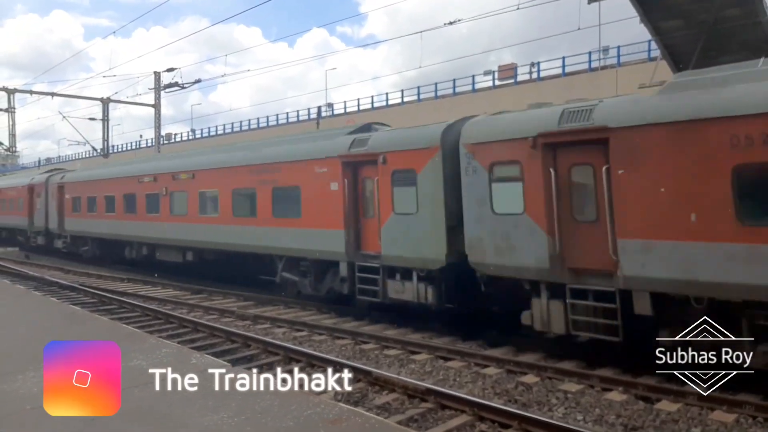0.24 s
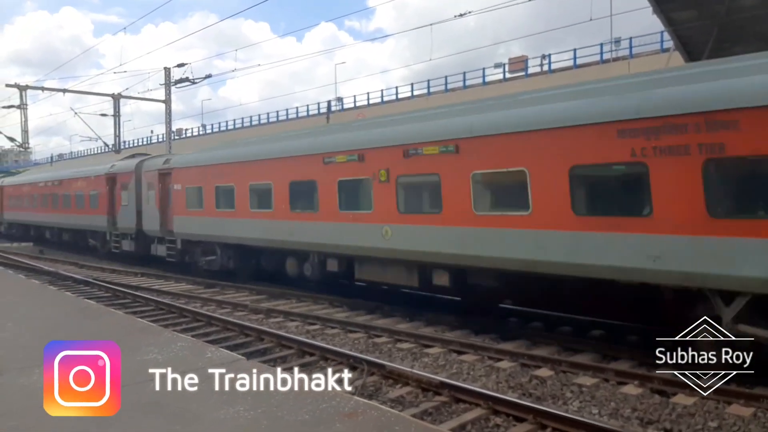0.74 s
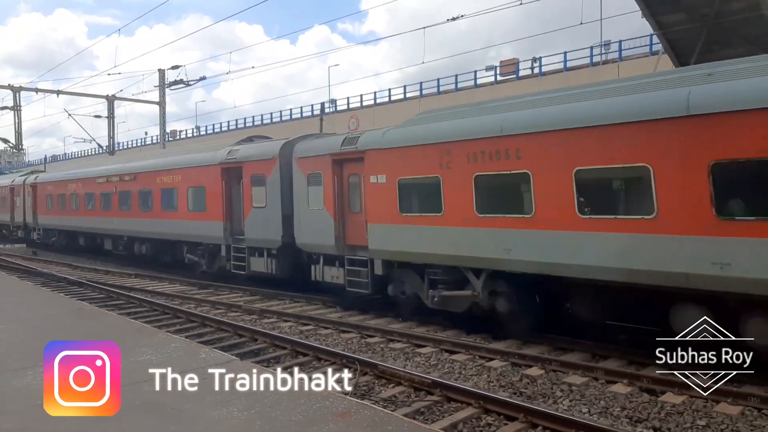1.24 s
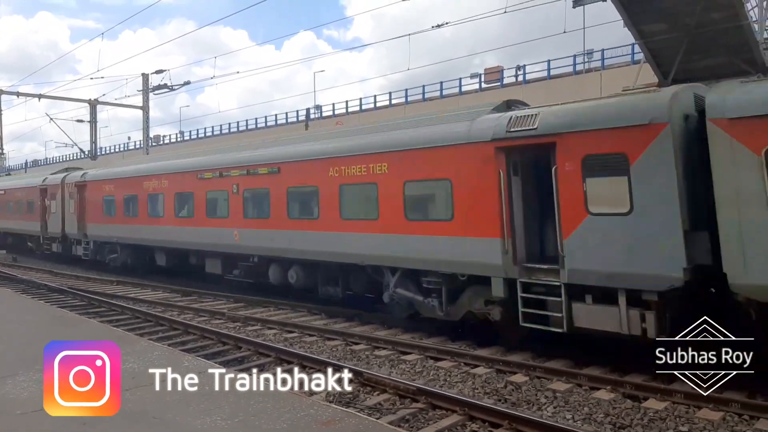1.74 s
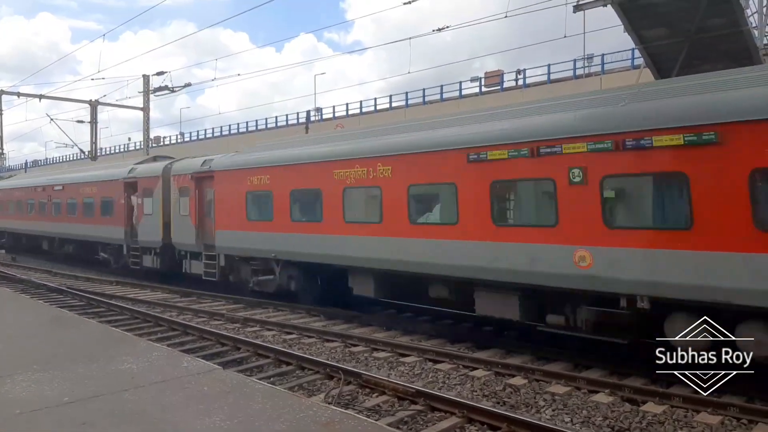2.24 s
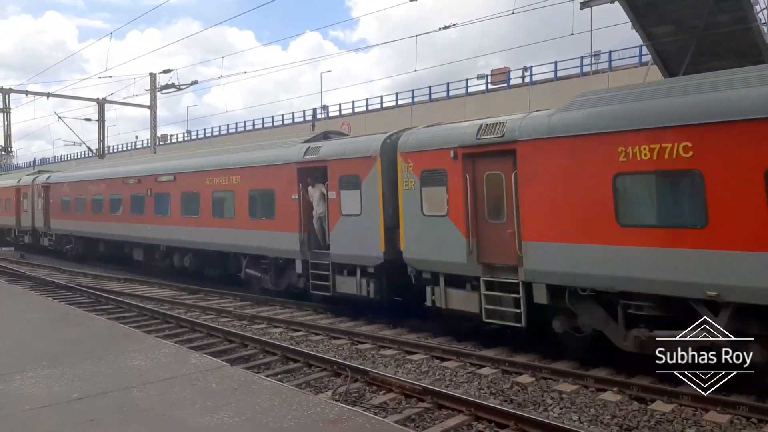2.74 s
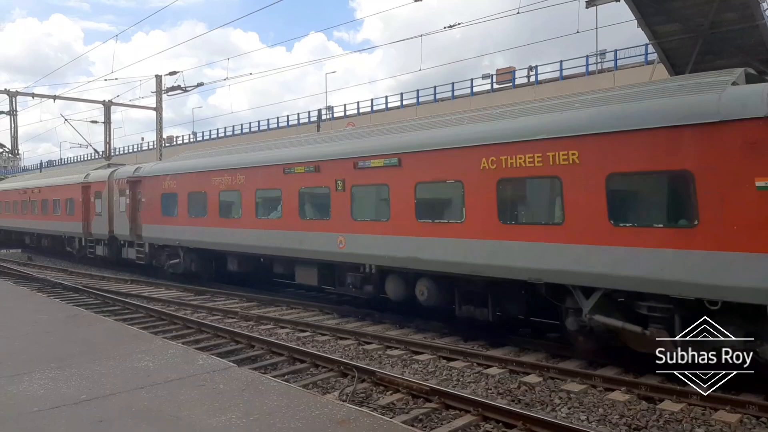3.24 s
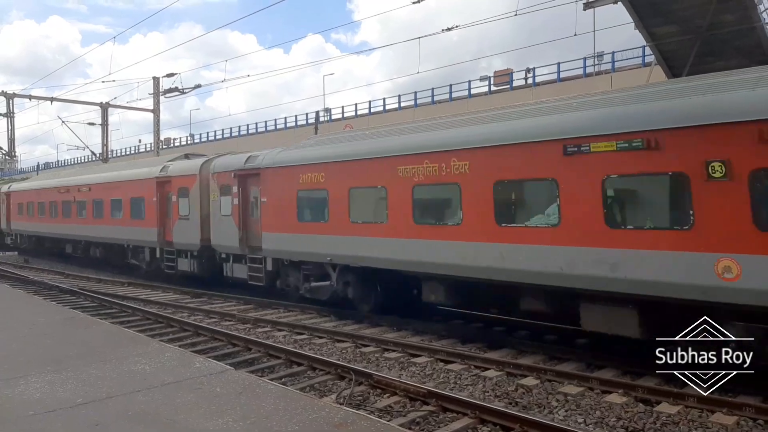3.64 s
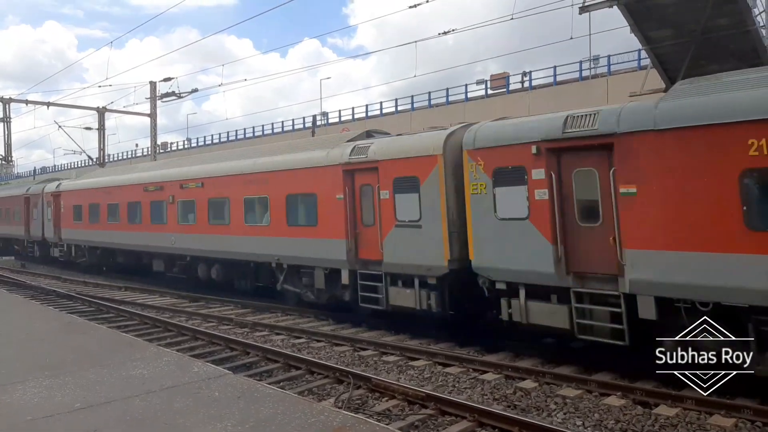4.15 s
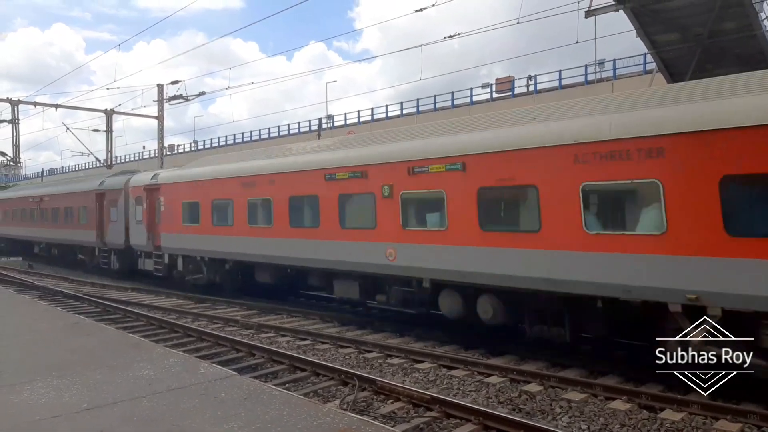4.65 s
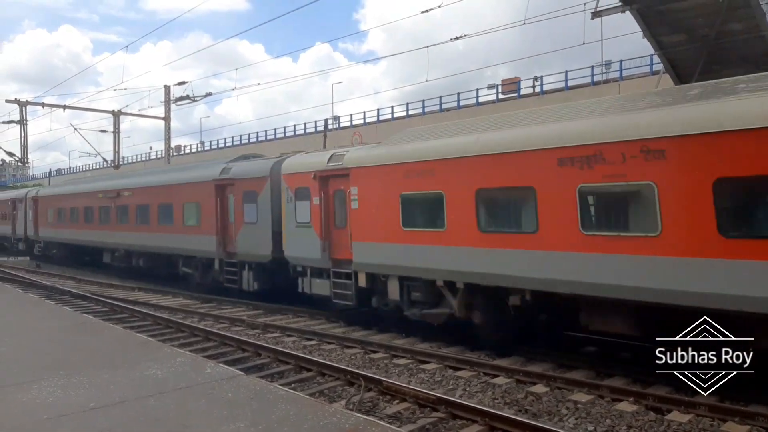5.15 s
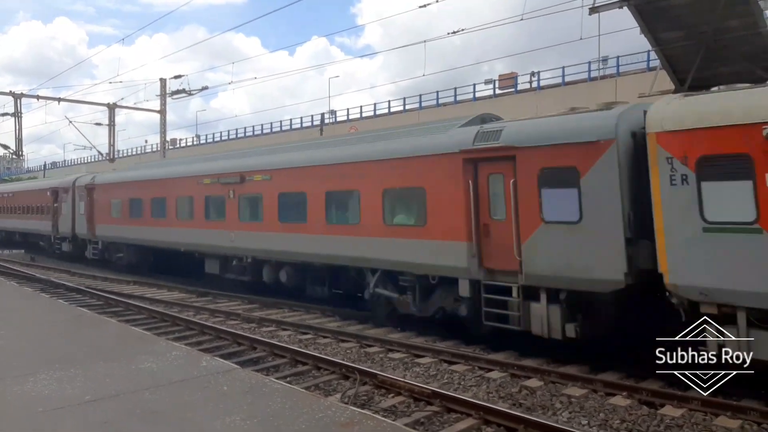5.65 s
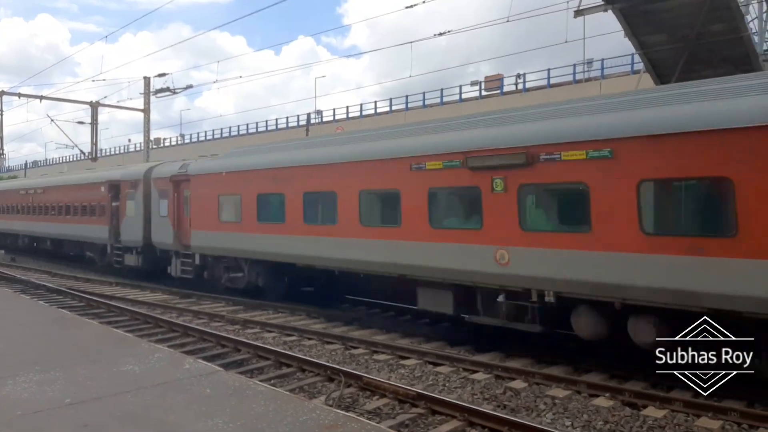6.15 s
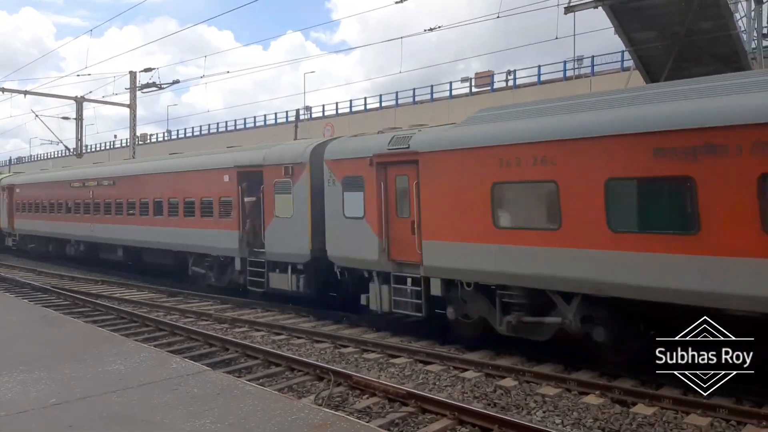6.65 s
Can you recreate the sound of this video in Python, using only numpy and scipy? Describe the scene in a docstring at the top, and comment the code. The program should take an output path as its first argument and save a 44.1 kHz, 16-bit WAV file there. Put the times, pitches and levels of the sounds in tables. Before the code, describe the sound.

Passenger train coaches roll past close by, wheels thudding and clanging over rail joints in a steady rhythm above a low rumble.

```python
"""Express coaches over a rail crossing

Coaches roll past a station platform, slowly losing speed. Every bogie meets the same joints and dips,
first with its leading and then with its trailing axle. The impacts excite damped modes: the track thuds
and the wheels clang. Flange friction scrapes and sizzles. Between the blows, surface roughness keeps up
a rumble, a rail hiss and the singing of the wheels, while the coach bodies drone."""
import sys
import numpy as np
from scipy import signal
from scipy.fft import rfft, irfft, next_fast_len
from scipy.io import wavfile
from scipy.ndimage import map_coordinates

SR = 44100
rng = np.random.default_rng(int(sys.argv[2]) if len(sys.argv) > 2 else 0)


def transcribe(u):
    """Save the signal u as a 16-bit wav file named by the first command-line argument.

    u: samples, shape (n,) or (channels, n), limited to [-1, 1]; the rate is SR.
    q: integer samples, one column per channel.
    """
    v = np.clip(np.atleast_2d(u).T, -1, 1)
    q = np.round(v * 32767).astype(np.int16)
    wavfile.write(sys.argv[1], SR, q)


N = 303849
SPEED_M_PER_S, BRAKING_M_PER_S2, WHEELBASE_M = 18.7, 0.17, 2.56

# The passing bogies. Each row: arrival at the first joint in seconds, then relative levels in dB of the
# clang, the leading wheel's extra at that joint, its extra on landing just after, the scrape, the sizzle,
# the trailing wheel's extra rub, the roar, the thump at the nose and the tread hiss.
BOGIE_PASSES = [(-.141, -7.5, 0, 0, 3, 1.5, -0.5, 0, 0.5, -0.5),
                (.355, -7, -1.5, 0, 0.5, -1.5, 0, -0.5, 1, 0),
                (1.148, -9.5, -1.5, -2, 2.5, -2.5, -2, -1, 0, -1),
                (1.634, -10.5, -1.5, -6, -1.5, -7, 3, -0.5, 2, -2),
                (2.439, -9, 0.5, -3, -1, -12, 0.5, -0.5, -3, -2.5),
                (2.932, -11, -4, -8, 0.5, -3.5, 1, 0, 5, 2),
                (3.747, -3, -4.5, -2.5, 1, -6.5, 1.5, 0.5, -2, 0),
                (4.248, -6.5, -1.5, 0.5, 1, -2, 1, -1, -0.5, 1.5),
                (5.073, -4.5, -3, -2, 2.5, 6.5, -1, 0, -5, -2),
                (5.578, -6.5, -5, 0.5, -.5, -5.5, 2, -0.5, 0, 0),
                (6.417, -6, -1, -3, 1, -3, 0, -1.5, 1, -1), (6.925, -3, 0, 0, 0, 0.5, 0, 0, -2, -1)]
# Modes of the crossing's steel. Each row: frequency in Hz, relative level in dB, t60 in seconds.
CROSSING_MODES = [(990, -16, 0.039), (1390, -7, 0.055), (1870, -6.5, 0.13), (2225, -10, 0.31),
                  (2336, 1.5, 0.12), (2680, -6, 0.36), (2920, -25, 0.078), (3417, -0.5, 0.06),
                  (4200, -2.5, 0.086), (3930, -12, 0.051), (4200, -10, 0.023), (4280, -5.5, 0.095),
                  (4960, -23, 0.11)]
# Modes of the loaded ballast. Each row: frequency in Hz, relative level in dB, t60 in seconds.
BALLAST_MODES = [(102, -14, 0.12), (134.1, -3.5, 0.27), (158, -4.5, 0.096)]
# Hardest blows on the bogie frames, from rail dips and slack in the suspension.
# Each row: start in seconds, relative level in dB.
HARD_BLOWS = [(0.022, -7.0), (0.157, -6.0), (0.464, -4.0), (0.51, -8.0), (0.644, -7.0), (0.836, -16),
              (1.253, -6.0), (1.305, -5.0), (1.588, -19), (1.688, -10), (1.738, -8.0), (1.822, -6.0),
              (1.927, -6.0), (2.051, -12), (2.195, -16), (2.266, -15), (2.599, -5.0), (2.731, -8.0),
              (2.984, -9), (3.091, -5.0), (3.12, -8.0), (3.227, -6.0), (3.606, -16), (3.838, -7.0),
              (3.868, -6.0), (3.904, -6.0), (4.045, -7.0), (4.296, -8.0), (4.336, -8.0), (4.544, -6.0),
              (4.9, -16), (5.121, -8), (5.165, -8.0), (5.227, -8.0), (5.37, -8.0), (5.626, -8.0),
              (5.683, -6.0), (5.739, -7.0), (6.528, -7.0), (6.608, -8.0), (6.642, -8.0), (6.672, -6.0)]


def amp(db):
    """Decibels to amplitude ratio."""
    return 10 ** (np.asarray(db) / 20)


def unit(x):
    """Normalisation to rms 1."""
    return x / np.sqrt(np.mean(x ** 2) + 1e-20)


def along(points, hz):
    """Interpolation of (Hz, value) points on a logarithmic frequency axis."""
    frequencies, values = np.transpose(points)
    return np.interp(np.log(hz + 1), np.log(frequencies), values)


def shape(points):
    """Magnitude response through (Hz, dB) points."""
    return lambda hz: amp(along(points, hz))


def wobble(rate):
    """Smooth random modulation with rate knots a second."""
    return map_coordinates(rng.standard_normal(1024), [np.arange(N) * rate / SR], mode="wrap")


def filtered(x, response):
    """Linear filtering: the spectrum is multiplied by a frequency response."""
    size = next_fast_len(N + SR // 4)
    return irfft(rfft(x, size) * response(np.fft.rfftfreq(size, 1 / SR)), size)[..., :N]


def add(track, s, sound):
    """Superposition of a sound on a track, starting at s seconds."""
    start = int(round(s * SR))
    first, end = max(start, 0), min(start + len(sound), N)
    if end > first:
        track[first:end] += sound[first - start:end - start]


def shaken(force, response):
    """Random excitation: the force sets the level of a stereo noise, the response only its colour."""
    # Likeness of left and right. Each row: frequency in Hz, coherence from 0 to 1.
    coherence = [(30, 0.5), (120, 1), (300, 0.66), (600, 0.9), (1100, 0.32), (2200, 0.27), (4200, 0),
                 (8000, 0.34), (12000, 0.68)]

    def spread(hz):
        """Coherence divides the normalised response between mid and side."""
        gain = response(hz)
        angle = np.arccos(np.clip(along(coherence, hz), -1, 1)) / 2
        return gain / np.sqrt(np.mean(np.abs(gain) ** 2)) * np.array([np.cos(angle), np.sin(angle)])
    mid, side = filtered(force * rng.standard_normal((2, N)), spread)
    return np.array([mid + side, mid - side])


def impact_envelope(times, levels_db, attack, t60):
    """Incoherent blows add in power, each decaying by 60 dB in t60 seconds."""
    t, power = np.arange(SR) / SR, np.zeros(N)
    pulse = ((1 - np.exp(-t / attack)) * amp(-60 * t / t60)) ** 2
    for s, db in zip(times, levels_db):
        add(power, s, amp(db) ** 2 * pulse)
    return np.sqrt(power)


def struck_modes(times, levels_db, modes, attack, scatter_db, detune):
    """Free vibration: each blow rings damped modes at slightly new strengths and pitches."""
    t, out = np.arange(SR // 8) / SR, np.zeros(N)
    hz, mode_db, t60 = np.transpose(modes)[:, :, None]
    decay = amp(mode_db - 60 * t / t60) * (1 - np.exp(-t / attack))
    scatter = rng.standard_normal((len(times), 2, len(modes), 1))
    for s, db, (size, pitch) in zip(times, levels_db, scatter):
        phase = np.float32(2 * np.pi * hz * (1 + detune * pitch) * t)
        add(out, s, (amp(db + scatter_db * size) * decay * np.sin(phase)).sum(0))
    return out


def passing(levels_db, lag, distance_m):
    """Spherical spreading: summed strength of the bogies, each nearest lag s after the first joint."""
    offset_m = SPEED_M_PER_S * (np.arange(N) / SR - np.array(BOGIE_PASSES)[:, :1] - lag)
    power = amp(np.reshape(levels_db, (-1, 1))) ** 2 / (1 + (offset_m / distance_m) ** 2)
    return np.sqrt(power.sum(0))


def wheel_response(hz):
    """Modal superposition: a steel wheel's resonances add with alternating sign."""
    # Wheel modes. Each row: frequency in Hz, bandwidth in Hz, relative level in dB.
    modes = [(1197, 187, 6), (1634, 75, 4.5), (1845, 114, 5.5), (2347, 110, 3), (2530, 140, -3),
             (2943, 193, 1), (3524, 170, 2), (4023, 190, 2.5), (4530, 230, -2), (6700, 32, -1),
             (7000, 27, -27), (9200, 39, -16), (10800, 30, -24), (11900, 34, -18), (12745, 45, -20)]
    return sum((-1) ** k * amp(db) * 1j * hz * width / (centre ** 2 - hz ** 2 + 1j * hz * width)
               for k, (centre, width, db) in enumerate(modes))


def clinks(force, low_hz, high_hz, tilt, t60, count):
    """Loose steel parts ring at their natural frequencies, more often and harder as the force grows."""
    t, out = np.arange(SR // 14) / SR, np.zeros((2, N))
    chance = rng.random((count, 4))
    quantiles = (np.arange(count) + chance[:, 0]) / count
    starts = np.searchsorted(np.cumsum(force) / force.sum(), quantiles).clip(0, N - 1)
    pitches = low_hz * (high_hz / low_hz) ** chance[:, 1]
    decay = amp(-60 * t / t60)
    for start, hz, stereo_gains in zip(starts, pitches, 2 * chance[:, 2:] - 1):
        ring = np.sqrt(force[start]) * (hz / low_hz) ** tilt * decay * np.sin(2 * np.pi * hz * t)
        for side, gain in zip(out, stereo_gains):
            add(side, start / SR, gain * ring)
    return unit(out) * np.sqrt(np.mean(force ** 2))


def rolling():
    """Roughness excitation: treads make the track rumble, the rails hiss and the running gear jingle."""
    # Spectra of the track and of the rail steel. Each row: frequency in Hz, relative density in dB.
    track_spectrum = [(25, -17), (45, -13), (65, 0), (90, 1.5), (130, 3), (210, -1), (252, 4), (320, 0.5),
                      (420, -4), (750, -3), (1100, -26), (2000, -43), (5000, -73)]
    rail_spectrum = [(200, -54), (500, 10), (900, 6.5), (1400, -11), (2350, 4), (3100, -11.5), (4200, -3.5),
                     (5200, -3), (7700, -8), (8600, -24), (10500, -19), (12600, -16.5), (14500, -30),
                     (16000, -36)]
    # a steady part from the whole train, and a swell as each bogie comes nearest
    load = np.hypot(amp(-26), passing(-23.5, lag=0.32, distance_m=2.42))
    rumble = shaken(load * amp(1.3 * wobble(28)), shape(track_spectrum))
    *_, tread_db = np.transpose(BOGIE_PASSES)
    roughness = amp(0.9 * wobble(30))
    near = roughness * passing(tread_db - 31, lag=0.35, distance_m=4.1)
    far = roughness * amp(-37)
    rail, far_cutoff_hz = shape(rail_spectrum), 5000
    near_hiss = amp(-2.5) * shaken(near, rail)
    far_hiss = amp(-6.5) * shaken(far, lambda hz: rail(hz) / np.hypot(1, hz / far_cutoff_hz))
    both = np.hypot(near, far)
    jingle = amp(-3.5) * clinks(both, low_hz=807, high_hz=4676, tilt=-0.45, t60=0.052, count=4500)
    return rumble + near_hiss + far_hiss + jingle + amp(-5) * shaken(both, wheel_response)


def body_drone():
    """Narrow-band resonance: the coach bodies hum, fairly even in strength but wandering in pitch."""
    # Resonance of the bodies. Each row: frequency in Hz, relative density in dB.
    spectrum = [(150, -25), (225, -10.5), (250, -2.5), (277, 1), (300, -5.5), (345, -26), (500, -51)]
    noise = filtered(rng.standard_normal(N), shape(spectrum))
    analytic = signal.hilbert(noise, next_fast_len(N))[:N]
    return amp(-30.5) * unit(analytic.real / np.sqrt(np.abs(analytic) + 1e-9))  # the root evens out swells


def axles(contacts, trailing_db):
    """Each (delay s, dB) contact recurs one wheelbase later: times and levels, a row per bogie."""
    delay, db = np.transpose(contacts)
    arrival = np.array(BOGIE_PASSES)[:, :1]
    lag = WHEELBASE_M / (SPEED_M_PER_S - BRAKING_M_PER_S2 * arrival)
    times = np.hstack([arrival + delay, arrival + lag + delay])
    return times, np.tile(np.r_[db, db + trailing_db], (len(arrival), 1))


def joint_strikes(trailing_db):
    """Impact at a discontinuity: times and levels of every wheel striking every joint."""
    # Rail joints. Each row: time relative to the bogie's arrival in seconds, relative level in dB.
    joints = [(-.182, -8), (0, 8), (.018, 6), (.06, 2), (.111, 1), (.142, -9.5), (.162, -6), (.274, -2)]
    times, db = axles(joints, trailing_db)
    _, clang_db, entry_db, landing_db, *_ = np.transpose(BOGIE_PASSES)
    db = db + clang_db[:, None]
    db[:, 1] += entry_db
    db[:, 2] += landing_db
    return times.ravel(), db.ravel()


def wheel_clangs(times, db):
    """Hard contact excites high modes: a gritty crash, a clank of the crossing and a ringing wheel."""
    # Steel striking steel. Each row: frequency in Hz, relative density in dB.
    crash_spectrum = [(400, 9.5), (800, 16.5), (1300, -1.5), (1900, -12), (2450, 3.5), (3100, -17),
                      (4200, -5.5), (5200, -2.5), (7500, -3), (8600, -15.5), (10500, -17), (12600, -14),
                      (14500, -25), (16000, -31)]
    force = impact_envelope(times, db, attack=0.001, t60=0.24)
    crash = amp(-22.5) * shaken(force * amp(2.7 * wobble(260)), shape(crash_spectrum))
    ring = amp(-22) * shaken(impact_envelope(times, db, attack=0.0015, t60=0.26), wheel_response)
    clank = [struck_modes(times, db, CROSSING_MODES, attack=0.0021, scatter_db=4, detune=0.0213)
             for side in range(2)]
    return crash + ring + amp(-29) * np.array(clank)


def dip_blows(trailing_db, jitter_s, count):
    """Periodic forcing: times and levels of the axles pounding evenly spaced dips in the rail."""
    first_dip_s, spacing_m = 0.002, 0.96
    deepest_m, half_width_m = 2.4, 1.97
    place_m = spacing_m * np.arange(count)
    dip_db = -0.5 - 3 * ((place_m - deepest_m) / half_width_m) ** 2
    dips = np.c_[first_dip_s + place_m / SPEED_M_PER_S, dip_db]
    times, db = map(np.ravel, axles(dips, trailing_db))
    # a hard blow within 18 ms takes the place of the ordinary one
    ordinary = np.abs(times[:, None] - np.transpose(HARD_BLOWS)[0]).min(1) > 0.018
    return (times + jitter_s * rng.standard_normal(times.size))[ordinary], db[ordinary]


def track_thuds(times, db):
    """Impacts excite the low, damped modes of ballast and sleepers, and the running gear rattles."""
    # Rail and sleepers on their bed. Each row: frequency in Hz, relative level in dB, t60 in seconds.
    sleeper_modes = [(244, -4, 0.17), (276.1, 0.5, 0.2), (306, -5.5, 0.28), (363.6, -6.5, 0.21),
                     (502, -16, 0.21), (622, -9.5, 0.15), (775, -21, 0.34)]
    # Rattle of the running gear. Each row: frequency in Hz, relative density in dB.
    rattle_spectrum = [(40, -35), (90, -9), (140, -3), (200, 1.5), (280, 8.5), (420, -15), (680, -16.5),
                       (1000, -43), (1500, -38), (4000, -69)]
    ballast = struck_modes(times, db, BALLAST_MODES, attack=0.017, scatter_db=4.5, detune=0.061)
    sleepers = struck_modes(times, db, sleeper_modes, attack=0.0042, scatter_db=1.5, detune=0.02)
    rattle = shaken(impact_envelope(times, db, attack=0.0011, t60=0.2), shape(rattle_spectrum))
    return amp(-19.5) * ballast + amp(-7.5) * sleepers + amp(-15) * rattle


def contact_stroke(rise, length, fade):
    """Sustained contact: a linear rise, a hold until length, an exponential fade, all in seconds."""
    t = np.arange(SR) / SR
    return np.clip(t / rise, 0, 1) * np.exp(-np.maximum(t - length, 0) / fade)


def track_roar():
    """Forced vibration: the loaded crossing shudders on its sleepers, most while it bears both axles."""
    shudder = [(40, -43), (85, -2.5), (135, -5), (185, -2), (250, -14.5), (300, -3.5), (420, -5),
               (640, -7.5), (900, -13), (2500, -58)]
    growl = [(100, -17), (200, 1), (360, 9.5), (480, 0), (630, 0), (850, -10.5), (1500, -31)]
    load, both_axles = np.zeros((2, N))
    for arrival, *_, roar_db, _, _ in BOGIE_PASSES:
        add(load, arrival + 0.056, amp(roar_db) * contact_stroke(rise=0.071, length=0.299, fade=0.019))
        add(both_axles, arrival + 0.088, amp(roar_db) * contact_stroke(rise=0.017, length=0.18, fade=0.02))
    return amp(-19.5) * shaken(load, shape(shudder)) + amp(-24) * shaken(both_axles, shape(growl))


def nose_thumps(trailing_db):
    """Each axle drops into the gap at the crossing's nose; the impact excites the ballast modes."""
    # The drop. Each row: delay after the first joint in seconds, relative level in dB.
    nose = [(.09, -5)]
    times, db = axles(nose, trailing_db)
    *_, thump_db, _ = np.transpose(BOGIE_PASSES)
    db = (db + thump_db[:, None]).ravel()
    thumps = struck_modes(times.ravel(), db, BALLAST_MODES, attack=0.0028, scatter_db=1.5, detune=0.039)
    return amp(-10.5) * thumps


def flange_force(levels_db, delay_s, stroke):
    """The friction of each bogie's leading and then trailing wheel adds in power."""
    power = np.zeros(N)
    times, _ = axles([(delay_s, 0)], trailing_db=0)
    trailing_rub_db = np.transpose(BOGIE_PASSES)[6]
    for (leading, trailing), db, extra_db in zip(times, levels_db, trailing_rub_db):
        add(power, leading, (amp(db) * stroke) ** 2)
        add(power, trailing, (amp(db + extra_db) * stroke) ** 2)
    return np.sqrt(power)


def wheel_scrape():
    """Sliding friction: flanges hiss and chatter through the crossing; some add a fitful sizzle."""
    # Spectra of rubbing and of skidding. Each row: frequency in Hz, relative density in dB.
    rub_spectrum = [(500, 6.5), (1500, -3), (4500, 5), (7600, 5), (8700, -18), (10800, -12), (13000, -11),
                    (14500, -38), (16000, -16)]
    skid_spectrum = [(3000, -49), (6500, -21), (8000, 14.5), (8700, -2), (10800, -2), (13000, 4),
                     (14300, -9), (16000, 12)]
    fizz_spectrum = [(8500, -28), (9600, 1.5), (12800, -1), (14200, -10), (16000, -13)]
    scrape_db, sizzle_db = np.transpose(BOGIE_PASSES)[4:6]
    rub = flange_force(scrape_db, delay_s=0.1, stroke=contact_stroke(rise=0.028, length=0.084, fade=0.07))
    rub *= amp(1.5 * wobble(45))
    scrape = amp(-35.5) * shaken(rub, shape(rub_spectrum)) + amp(-33.5) * shaken(rub, wheel_response)
    chatter = amp(-31) * clinks(rub, low_hz=1520, high_hz=5985, tilt=-0.59, t60=0.11, count=3500)
    skid_stroke = contact_stroke(rise=0.037, length=0.088, fade=0.17)
    skid = flange_force(sizzle_db, delay_s=0.092, stroke=skid_stroke) * amp(3.2 * wobble(79))
    sizzle = amp(-42.5) * shaken(skid, shape(skid_spectrum))
    ring = amp(-44) * shaken(skid, lambda hz: wheel_response(hz) * shape(skid_spectrum)(hz))
    fizz = amp(-46) * shaken(np.hypot(skid, amp(-3.5) * rub), shape(fizz_spectrum))
    return scrape + chatter + sizzle + ring + fizz


def gear_knocks():
    """Impulse response to a hard blow: a heavy knock of the frame, a ballast thump and a dry crack."""
    # Modes of a bogie frame. Each row: frequency in Hz, relative level in dB, t60 in seconds.
    frame_modes = [(144.5, -13.5, 0.094), (261, -1.5, 0.13), (294, 0.5, 0.077), (390, -8, 0.038),
                   (617, -7, 0.05), (773, -23, 0.16)]
    crack_spectrum = [(150, -26), (300, 3.5), (650, 2), (1200, -9.5), (2500, -17), (6000, -22.5),
                      (12000, -44)]
    times, db = np.transpose(HARD_BLOWS)
    frame = struck_modes(times, db, frame_modes, attack=0.004, scatter_db=0.5, detune=0.025)
    thump = struck_modes(times, db, BALLAST_MODES, attack=0.017, scatter_db=5, detune=0.067)
    crack = shaken(impact_envelope(times, db, attack=0.00096, t60=0.11), shape(crack_spectrum))
    return amp(3.5) * frame + amp(-12.5) * (thump + crack)


def steel_clanks():
    """Impact noise of wheels, brake rigging and steps: a hollow clank, a clink and a ringing crossing."""
    # Jolts under the coaches. Each row: start in seconds, relative clank and clink levels in dB.
    jolts = [(.04, -15, -29.5), (0.174, -15, -40), (.376, -27, -22), (.762, -22, -40), (0.984, -20, -24),
             (1.171, -21, -18), (1.259, -34, -31), (1.287, -27, -28), (1.372, -20, -15.5),
             (1.424, -26, -19), (1.637, -36, -23), (1.658, -35, -15.5), (1.708, -28, -32),
             (1.749, -34, -19.5), (1.96, -25, -31), (2.053, -29, -36), (2.100, -29, -33), (2.155, -22, -33),
             (2.269, -47, -30), (2.441, -33, -19), (2.463, -28, -12.5), (2.58, -15.5, -24),
             (2.596, -14.5, -20), (2.673, -24, -28), (2.697, -25, -30), (2.712, -34, -18),
             (2.862, -26, -38), (2.934, -21, -30), (2.953, -24, -14), (3.074, -19, -20), (3.14, -19, -18),
             (3.211, -19, -26), (3.393, -20, -31), (3.751, -25, -24), (3.77, -22, -19), (3.888, -23, -22),
             (3.912, -24, -27), (3.937, -14.5, -32), (4.06, -19, -33), (4.389, -19, -28), (4.538, -26, -24),
             (5.077, -31, -22), (5.211, -31, -24), (5.921, -20, -22), (6.090, -21, -28), (6.432, -28, -19),
             (6.579, -14.5, -26), (6.738, -30, -23)]
    times, clank_db, clink_db = np.transpose(jolts)
    hollow = [(300, -19), (700, 15), (1250, 7.5), (1500, -3), (1850, 3), (2400, -10), (5000, -34)]
    bright = [(1200, -33), (2400, 9), (3200, 1), (4100, -1), (7000, -10), (9000, -14), (15000, -30)]
    clank = shaken(impact_envelope(times, clank_db, attack=0.0014, t60=0.1), shape(hollow))
    ring = [struck_modes(times, clink_db, CROSSING_MODES, attack=0.0008, scatter_db=3, detune=0.04)
            for side in range(2)]
    clink = shaken(impact_envelope(times, clink_db, attack=0.00087, t60=0.088), shape(bright))
    return amp(-0.5) * clank + amp(-11) * np.array(ring) + amp(-6.5) * clink


def wheel_song(glide_per_s):
    """Wheel resonances fed by the rough rail swell and fade, their pitch sinking by the Doppler effect."""
    # Singing wheels. Each row: time of the peak in seconds, length of the swell (and of the fade) in
    # seconds, pitch in Hz, bandwidth in Hz, relative level in dB.
    songs = [(.66, .4, 3650, 90, -43), (1.19, .12, 3460, 50, -39), (1.2, .12, 2280, 50, -39),
             (1.55, .16, 4480, 130, -40), (1.6, .6, 2950, 150, -39), (1.9, .16, 4120, 200, -38),
             (2.13, .25, 4000, 60, -42), (2.1, .65, 2380, 170, -39), (2.15, .3, 4590, 190, -45),
             (2.55, .2, 2395, 70, -35), (2.68, .3, 2910, 130, -37), (2.6, .28, 4260, 160, -39),
             (3.1, .35, 2410, 110, -35), (3.15, .25, 4080, 200, -38), (3.45, .35, 3545, 150, -40),
             (3.8, .15, 3555, 70, -37), (3.9, .45, 2400, 130, -38), (4.06, .22, 3570, 90, -37),
             (4.12, .18, 3020, 60, -41), (4.22, .2, 4600, 100, -41), (4.72, .15, 3680, 40, -43),
             (4.84, .25, 3420, 90, -45), (4.8, .4, 1840, 90, -42), (5.65, .2, 1855, 50, -37),
             (5.63, .15, 4090, 60, -40), (5.78, .14, 4520, 110, -40), (5.9, .28, 6865, 80, -45),
             (6.06, .16, 4440, 45, -44), (6.13, .25, 3490, 90, -41), (6.58, .22, 1885, 70, -38),
             (6.88, .25, 4060, 110, -41), (6.88, .15, 3470, 40, -40)]
    out = np.zeros((2, N))
    roughness = rng.standard_normal((len(songs), 2, 2, 256))
    for (peak_s, swell_s, hz, width_hz, db), stereo_noise in zip(songs, roughness):
        t = np.arange(-swell_s, swell_s, 1 / SR)
        envelope = amp(db) * np.cos(np.pi / 2 * t / swell_s) ** 2
        tone = envelope * np.exp(2j * np.pi * hz * (t - glide_per_s * t ** 2 / 2))
        for side, (real, imag) in zip(out, stereo_noise):
            modulation = np.interp((t + swell_s) * width_hz, np.arange(len(real)), real + 1j * imag)
            add(side, peak_s - swell_s, (tone * modulation).real)
    return out


def scene():
    """All sources superpose at the platform; a level difference places the train a little to the left."""
    # Stereo balance by pitch. Each row: frequency in Hz, left minus right level in dB.
    balance = [(40, 3.5), (130, 5), (260, 2.5), (550, 3.5), (1100, 3.5), (2200, 2.5), (4200, 0.5),
               (12000, -0.5)]
    # Drift of that balance. Each row: time in seconds, further left minus right level in dB.
    drift = [(0, -0.6), (2.6, -1.6), (3.6, 1.3), (5.2, 0.5), (6.9, 0.5)]
    train = rolling() + body_drone()
    train += wheel_clangs(*joint_strikes(trailing_db=-5.5))
    train += track_thuds(*dip_blows(trailing_db=-0.5, jitter_s=0.00199, count=4))
    train += track_roar() + nose_thumps(trailing_db=7.5) + wheel_scrape()
    train += gear_knocks() + steel_clanks() + amp(2) * wheel_song(glide_per_s=0.0342)
    sides = np.array([[0.5], [-0.5]])
    drift_db = np.interp(np.arange(N) / SR, *np.transpose(drift))
    return filtered(train, lambda hz: amp(sides * along(balance, hz))) * amp(sides * drift_db)


def record(dry):
    """Band limiting and saturation: the phone sheds deep bass and top treble and rounds off peaks."""
    low_cut_hz, top_hz, ceiling = 48, 15800, 0.98
    high_passed = filtered(dry, lambda hz: hz ** 2 / np.hypot(hz ** 2, low_cut_hz ** 2))
    rounded = high_passed / (1 + np.abs(high_passed / ceiling) ** 6) ** (1 / 6)
    return filtered(rounded, lambda hz: hz < top_hz)


dry = scene()
out = record(dry)
transcribe(out)
```